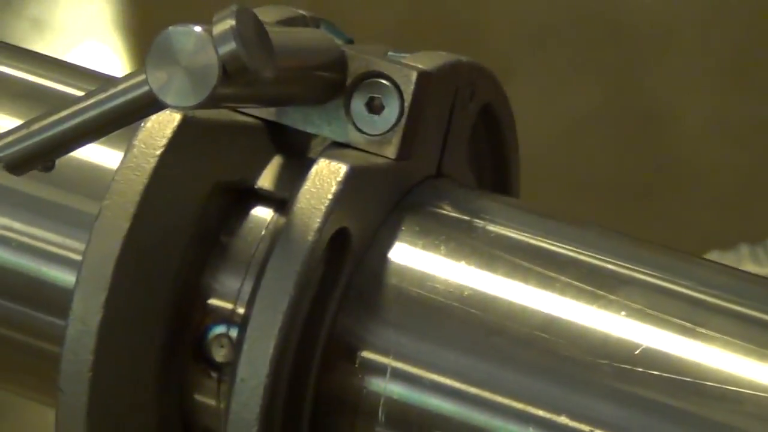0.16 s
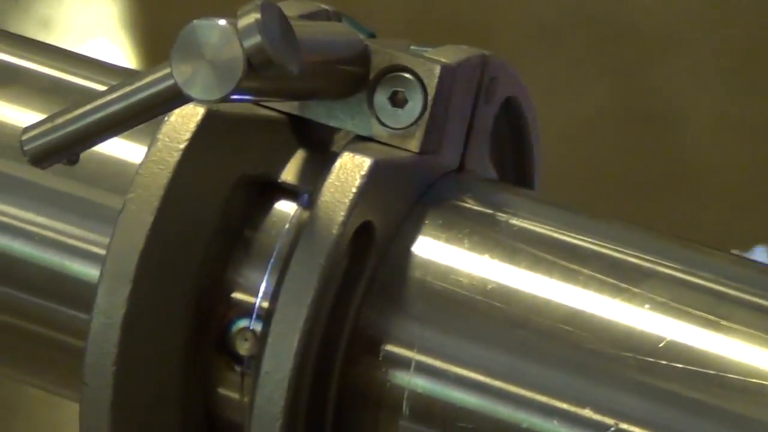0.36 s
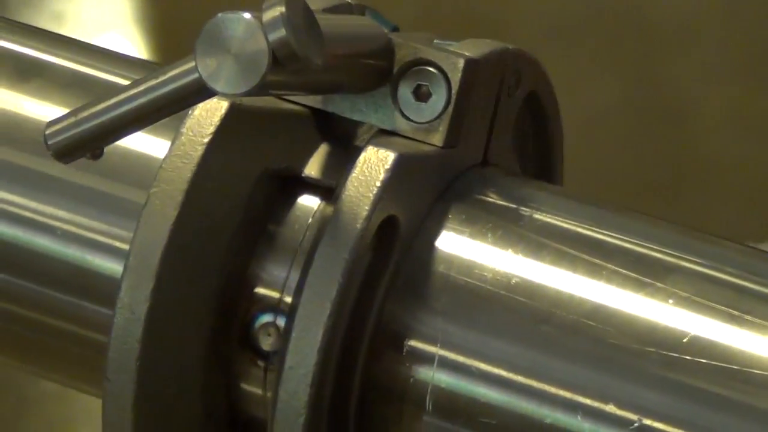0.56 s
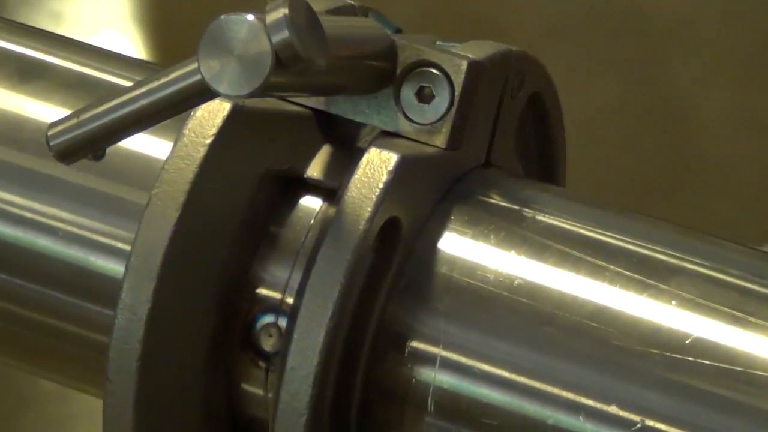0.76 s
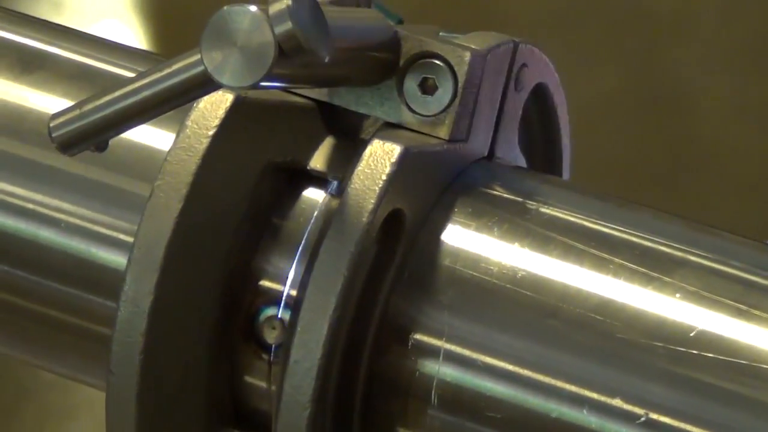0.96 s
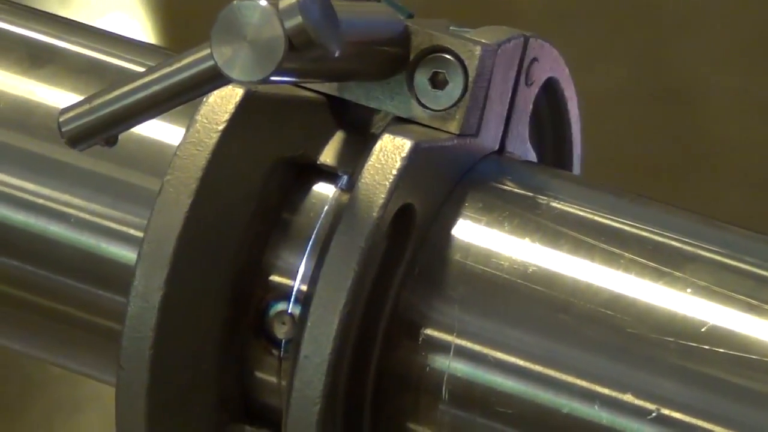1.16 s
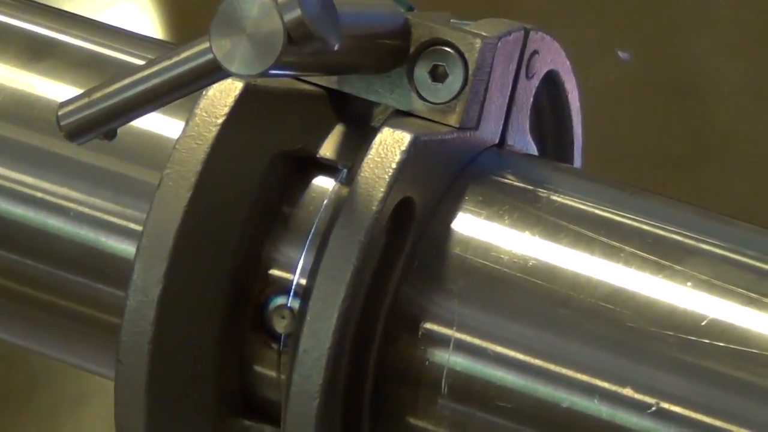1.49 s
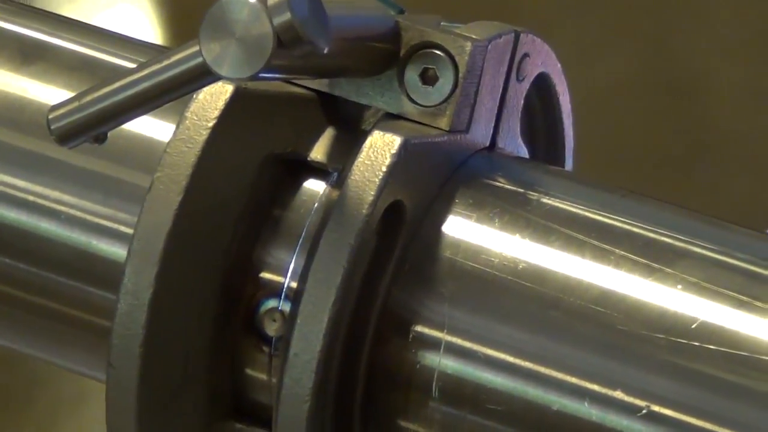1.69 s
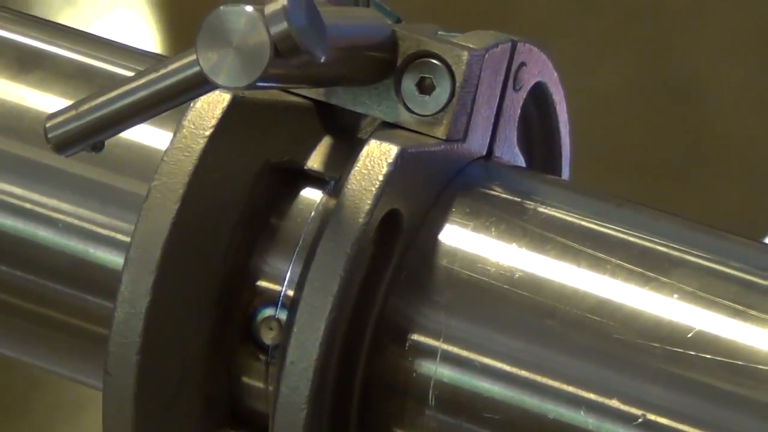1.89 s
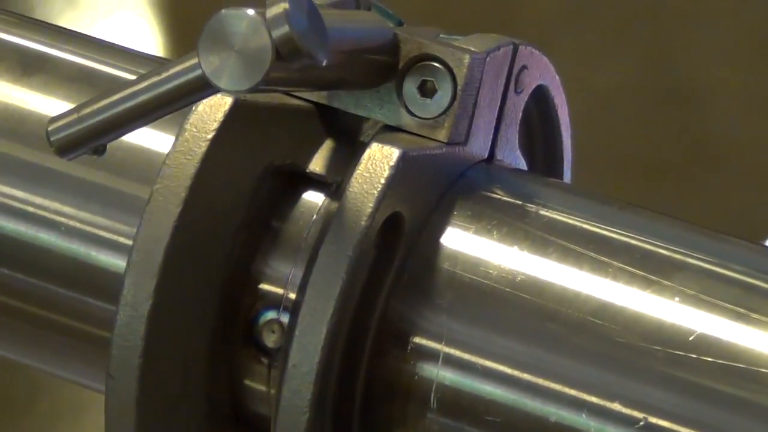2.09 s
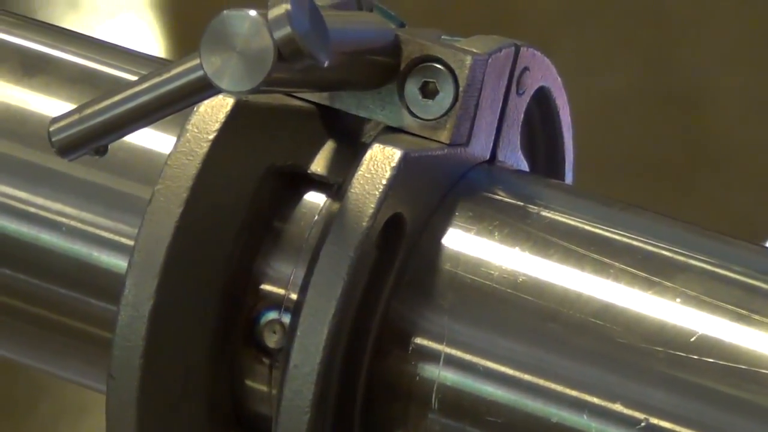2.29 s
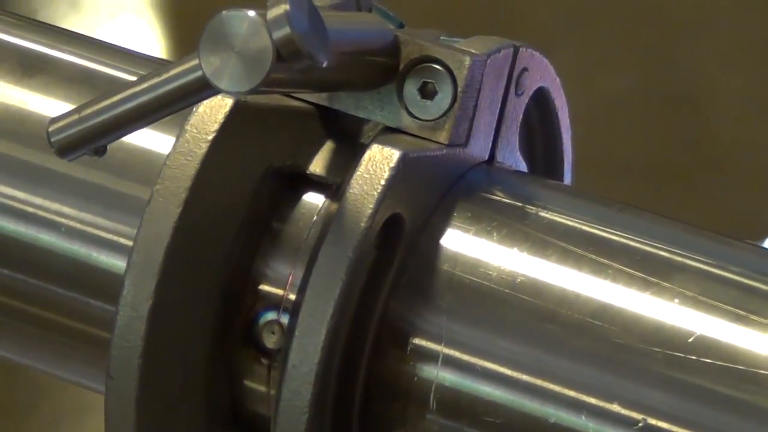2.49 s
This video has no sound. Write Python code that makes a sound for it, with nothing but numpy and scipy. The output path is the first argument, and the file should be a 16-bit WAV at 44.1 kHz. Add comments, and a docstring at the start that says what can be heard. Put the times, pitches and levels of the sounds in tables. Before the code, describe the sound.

A welding torch hisses close by over faint workshop machine hum. At 0.2 seconds a valve clicks and gas surges out. A spark snaps at 0.4 seconds; the arc sputters and pops out at 0.6. Another snap relights it at 0.9 seconds, broadening the hiss and adding a soft low roar. The hiss then fades steadily until about 2.6 seconds, with thin breathy whistles stepping down in pitch.

```python
"""Machines hum in a workshop, then a valve clicks close to the microphones: arc welding on a steel tube.
Shielding gas surges from the torch, hissing and whistling lower and softer as its pressure falls.
A spark lights the arc, which sputters out and is lit again; while it burns, the jet is broader and
has a low roar. The tube and clamp throw back short echoes."""
import sys
import numpy as np
from scipy import signal
from scipy.fft import rfft, irfft, next_fast_len
from scipy.io import wavfile
from scipy.ndimage import uniform_filter1d, map_coordinates

SR = 44100
rng = np.random.default_rng(int(sys.argv[2]) if len(sys.argv) > 2 else 0)


def wav_out(sig):
    """Save sig, one row per channel (or a flat mono array), as 16-bit PCM at SR to the path in sys.argv[1]."""
    wavfile.write(sys.argv[1], SR, np.round(np.clip(np.atleast_2d(sig).T, -1, 1) * 32767).astype(np.int16))


N = 116865
T = np.arange(N) / SR


def amp(db):
    """Decibels to gain."""
    return 10 ** (np.asarray(db) / 20)


def unit(x):
    """Scale to rms 1."""
    return x / np.sqrt(np.mean(x ** 2) + 1e-20)


def along(points, hz):
    """Read (Hz, value) points on a log frequency axis."""
    freqs, values = np.transpose(points)
    return np.interp(np.log(hz + 1), np.log(freqs + 1), values)


def wobble(rate):
    """A smooth random curve, rate knots a second."""
    return map_coordinates(rng.standard_normal(int(N * rate / SR) + 4), [T * rate])


def filtered(x, response):
    """Pass x through a complex frequency response."""
    size = next_fast_len(N + SR // 2)
    return irfft(rfft(x, size) * response(np.fft.rfftfreq(size, 1 / SR)), size)[..., :N]


def coloured(x, spectrum, peaks=()):
    """Give x a spectrum and resonances, at rms 1."""
    def response(hz):
        boost_db = sum(db / (1 + ((hz - centre) / width) ** 2) for centre, width, db in peaks)
        return amp(along(spectrum, hz) + boost_db)
    return unit(filtered(x, response))


# Stereo width at the microphones. Each row: frequency in Hz, side over mid in dB.
STEREO_WIDTH = [(30, -24), (120, -23), (500, -14.5), (1000, -12.5), (4000, -17.5), (12000, -28.5)]

def rush(spectrum, peaks=()):
    """Coloured noise, nearly alike at both microphones."""
    mid, side = coloured(rng.standard_normal((2, N)), spectrum, peaks)
    side = filtered(side, lambda hz: amp(along(STEREO_WIDTH, hz)))
    return mid + np.array([side, -side])


# Room tone behind the bench. Each row: frequency in Hz, relative level in dB.
VENTILATION = [(25, -10), (45, -14), (130, -5), (250, 1), (430, -0.5), (1000, -5), (2000, -13),
               (5200, -21.5), (6500, -20), (7500, -23), (8700, -23), (15000, -33)]
RUMBLE = [(20, -10), (33, 10), (48, -17), (70, 2), (120, -3), (300, -57)]
# The rumble's rise and fall. Each row: time in seconds, level in dB.
RUMBLE_LEVEL = [(0, -63), (1.2, -52), (2.32, -59), (2.43, -54), (2.65, -47)]
# Machines farther back. Each row: frequency in Hz, level in dB halfway through.
MACHINE_HUM = [(59.5, -61), (97, -55.5), (359, -49), (415, -47)]

def workshop():
    """Ventilation noise, low rumble and a wavering machine hum that slowly grows."""
    hum = np.zeros(N)
    for hz, db in MACHINE_HUM:
        level = amp(db + 1.5 * wobble(5.8))
        hum += level * np.sqrt(2) * np.sin(2 * np.pi * hz * T + 0.88 * wobble(15))
    growth = amp(1.5 * (T - T.mean()))  # 1.5 dB a second
    rumble = amp(np.interp(T, *np.transpose(RUMBLE_LEVEL))) * rush(RUMBLE)
    return amp(-39) * rush(VENTILATION) + rumble + growth * hum


def room(x, t60=0.12):
    """The workshop's short diffuse tail, different at each microphone."""
    t = T[:SR // 2]
    tail = rng.standard_normal((2, len(t))) * amp(-60 * t / t60) * (t > .006)
    return signal.fftconvolve(x, tail / np.linalg.norm(tail[0]), axes=1)[:, :N]


# Steel and bench, within a metre of the torch. Each row: delay in milliseconds, gain.
ECHOES = [(.96, -.13), (1.212, -.13), (4.874, -.09), (5.024, .11), (5.116, .33), (5.217, -.14)]

def close_echoes(x):
    """The direct sound plus its reflections from the steel and the bench."""
    return filtered(x, lambda hz: 1 + sum(g * np.exp(-2j * np.pi * hz * ms / 1000) for ms, g in ECHOES))


VALVE_SEATS_S = .218
VALVE_TOUCH_S = VALVE_SEATS_S - .0027
# The valve's ring. Each row: frequency in Hz, relative level in dB, seconds to fall 60 dB.
VALVE_MODES = [(704, -10, 0.047), (1133, -12, 0.11), (1524, -12, 0.044), (2440, -2.5, 0.034),
               (4310, -0.5, 0.011), (5260, -13, 0.011), (6250, -3, 0.011)]
# Its contact noise. Each row: frequency in Hz, relative level in dB.
VALVE_CRACK = [(100, -31), (700, 2), (2500, 1), (6000, -12), (15000, -18)]

def valve(crack_t60=0.024):
    """The gas valve touches softly, then seats; both contacts ring it."""
    out = np.zeros(N)
    for start, db in [(VALVE_TOUCH_S, -31.5), (VALVE_SEATS_S, -16.5)]:
        t = np.maximum(T - start, 0)
        ring = sum((-1) ** k * amp(level - 60 * t / t60) * np.sin(2 * np.pi * hz * t)
                   for k, (hz, level, t60) in enumerate(VALVE_MODES))
        crack = (t > 0) * amp(-3.5 - 60 * t / crack_t60) * coloured(rng.standard_normal(N), VALVE_CRACK)
        out += amp(db) * (ring + crack)
    return out


# Tones at the nozzle. Each row: start and length in seconds, first and last pitch in Hz, level in dB.
WHISTLES = [(.64, .36, 10550, 9800, -28), (.77, .135, 8700, 8450, -21.5), (1.12, .2, 7400, 6880, -28),
            (1.37, .12, 8630, 8550, -32), (1.57, .23, 5950, 5560, -41), (1.78, .125, 5520, 5380, -36.5),
            (1.895, .165, 5360, 5210, -36), (2.1, .22, 3980, 3870, -46), (2.3, .26, 4570, 4450, -42),
            (2.33, .36, 3815, 3710, -37)]

def whistles(roughness=.85, width_hz=130):
    """Each breathy nozzle tone swells, sinks with the gas pressure and gives way to another."""
    out = np.zeros(N)
    for start, length, first_hz, last_hz, db in WHISTLES:
        progress = np.clip((T - start) / length, 0, 1)
        phase = 2 * np.pi * np.cumsum(first_hz + (last_hz - first_hz) * progress) / SR
        waver = 1 + roughness * (wobble(width_hz) + 1j * wobble(width_hz))
        swell = np.sqrt(4 * progress * (1 - progress))
        out += amp(db) * swell * unit((waver * np.exp(1j * phase)).real)
    return out


# The arc lights, dies and relights. Each row: time in seconds, snap peak in dB, 1 if lit or 0 if out.
ARC_SWITCHES = [(.4035, -5, 1), (.6027, -5, 0), (.9075, -3, 1)]
CHOKE_LEAD_S = .003  # the gas dips just ahead of each snap

def arc_state():
    """Whether the arc burns (0 to 1), and the seconds since it last lit or died."""
    burning, age = np.zeros((2, N))
    for start, _, lit in ARC_SWITCHES:
        burning[T >= start] = lit
        age = np.where(T >= start, T - start, age)
    return uniform_filter1d(burning, size=200), age


def choke(depth_db):
    """Gain of the gas: shut before the valve opens, dipping at each switch of the arc."""
    corners_s = np.cumsum([0, .001, .01, .019])  # fall, hold, recover
    dips = sum(np.interp(T - start + CHOKE_LEAD_S, corners_s, [0, 1, 1, 0])
               for start, _, _ in ARC_SWITCHES)
    return amp(depth_db * dips) * (T > VALVE_TOUCH_S)


# The unsteady arc and a hollow tone under it. Each row: frequency in Hz, relative level in dB.
SPUTTER = [(60, -39), (200, -8.5), (400, -8), (590, -4), (790, -9), (1050, 6), (1250, -5), (1550, 2),
           (2300, -4), (4000, -4.5), (9000, -23)]
HOLLOW = [(200, -29), (430, -9), (520, -6.5), (600, -3), (680, -3), (850, -30)]

def sputter(pops_per_s=1600, full_at_s=.565, rise_db_per_s=81):
    """Dense low pops build up in the first arc until it goes out."""
    start, end = ARC_SWITCHES[0][0], ARC_SWITCHES[1][0] - CHOKE_LEAD_S
    pops = (rng.random(N) < pops_per_s / SR) * rng.uniform(-1, 1, N)
    level = amp(-22.5 + rise_db_per_s * np.minimum(T - full_at_s, 0)) * (T > start) * (T < end)
    return level * unit(coloured(pops, SPUTTER) + .5 * rush(SPUTTER) + amp(-6.5) * rush(HOLLOW))


# The spark, heard close up. Each row: frequency in Hz, relative level in dB.
SPARK = [(100, -36), (700, -19), (1500, -14), (5000, -10), (7500, -2), (10500, 0), (15800, -12)]

def snaps(decay_s=.0003, echo_s=.0051):
    """A bright spark lights the arc, a duller pop ends it; each comes back once from the bench."""
    out = np.zeros(N)
    for start, db, lit in ARC_SWITCHES:
        t = T - start
        burst = (t >= 0) * np.exp(-np.abs(t) / decay_s) * rng.standard_normal(N)
        snap = coloured(burst, SPARK if lit else SPUTTER)
        out += amp(db) * snap / np.abs(snap).max()
    return out + amp(-3.5) * np.roll(out, round(echo_s * SR))


# Gas flow at the torch, close to the microphones. Each row: time in seconds, relative level in dB.
GAS_FLOW = [(.215, -38), (.232, -27.5), (.26, -18), (.3, -17), (.48, -14), (.65, -16.5), (.9, -18.5),
            (1.0, -17), (1.32, -23.5), (1.62, -26.5), (1.92, -29.5), (2.3, -31.5), (2.65, -34)]
# Resonances of torch and clamp. Each row: centre in Hz, half width in Hz, boost in dB.
TORCH_RESONANCES = [(2770, 45, -7), (2928, 30, 4), (3085, 33, -3.5), (3768, 38, 7.5), (4260, 90, -2),
                    (4700, 25, 3), (6670, 34, 6.5), (6900, 57, 3.5), (7340, 79, 4), (8680, 99, 4),
                    (13000, 200, 0)]
# The hiss with the arc out and lit, its midrange body, the arc's roar and the ignition flare.
# Each row: frequency in Hz, relative level in dB.
COLD_JET = [(100, -52), (600, -23.5), (1900, -17.5), (2800, -1.5), (5300, -8), (7000, -2), (8800, 2.5),
            (10800, -1), (12500, -12), (14200, -11), (15800, -27)]
HOT_JET = [(100, -51), (600, -2), (2000, -14.5), (2900, -0.5), (5300, -13), (7000, 2.5), (9000, 0),
           (11700, -3), (13000, -4.5), (14300, -8), (15800, -11)]
JET_BODY = [(1500, -41), (2700, -7.5), (3700, 7), (5000, 3), (7000, -0.5), (10000, -16), (12000, -8),
            (14000, -12), (15800, -17)]
ROAR = [(30, -34), (120, -14), (230, 1), (420, -5), (620, -1.5), (900, -9.5), (1400, -11.5), (2200, -17),
        (5000, -41)]
FLARE = [(200, -28), (600, -13), (1100, 3), (2200, -17), (4000, -2), (5700, 6.5), (7000, -6), (15000, -8)]

def jet(roar_attack_s=.025, flare_peak_s=0.056):
    """The gas hisses narrowly when cold; the arc flares up, widens the hiss and adds a roar."""
    flow_db = np.interp(T, *np.transpose(GAS_FLOW))
    burning, age = arc_state()
    flutter = amp(0.15 * wobble(36.07) + 0.5 * wobble(500))
    cold = (1 - burning) * amp(-1) * rush(COLD_JET, TORCH_RESONANCES)
    hot = burning * amp(-2.5) * rush(HOT_JET, TORCH_RESONANCES)
    hiss = amp(flow_db) * (cold + hot)
    body = amp(-24.5 + .45 * flow_db) * rush(JET_BODY, TORCH_RESONANCES)  # fades slower than the flow
    attack = 1 - np.exp(-(age / roar_attack_s) ** 2)
    roar = attack * amp(-24 + 0.63 * flow_db + .5 * wobble(25.2)) * rush(ROAR)
    roar *= np.where(T > ARC_SWITCHES[-1][0], 1, amp(-10.5))  # the first, unsteady arc roars less
    flare = amp(-26.5) * (age / flare_peak_s * np.exp(1 - age / flare_peak_s)) ** 2 * rush(FLARE)
    return flutter * (hiss + body) + burning * (roar + flare)


def scene(choke_db=-8, split_hz=5100):
    """The torch up close with its echoes, the workshop behind it."""
    gas = jet() + sputter()
    low = filtered(gas, lambda hz: 1 / (1 + (hz / split_hz) ** 6))
    choked = choke(choke_db) * (gas - low) + choke(0.32 * choke_db) * low  # the treble dips most
    torch = close_echoes(choked) + choke(choke_db) * whistles() + valve() + snaps()
    return torch + amp(-16.5) * room(torch) + workshop()


# Balance of the microphone pair. Each row: frequency in Hz, left over right in dB.
MIC_BALANCE = [(60, 0.7), (500, 0.4), (1000, 0.5), (2000, -0.5), (4000, -1.3), (8000, -0.2), (12000, -1)]

def record(dry, top_hz=15800):
    """Two slightly unequal microphones, with nothing kept above the band limit."""
    left_right = np.array([[.5], [-.5]])
    return filtered(dry, lambda hz: amp(along(MIC_BALANCE, hz) * left_right) * (hz < top_hz))


dry = scene()
out = record(dry)
wav_out(out)
```